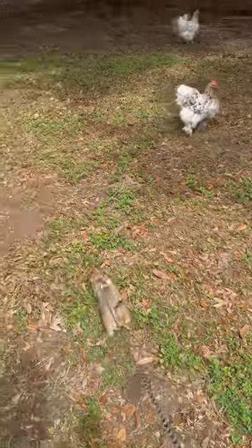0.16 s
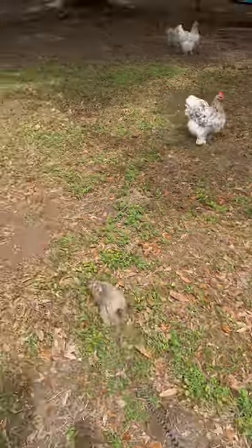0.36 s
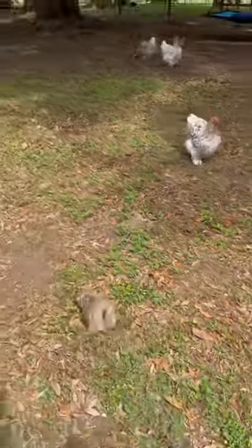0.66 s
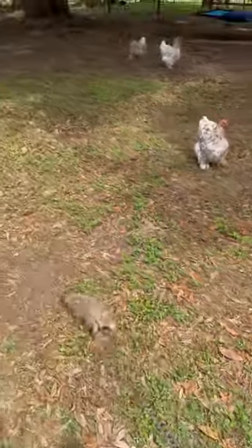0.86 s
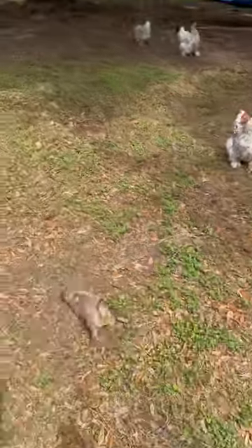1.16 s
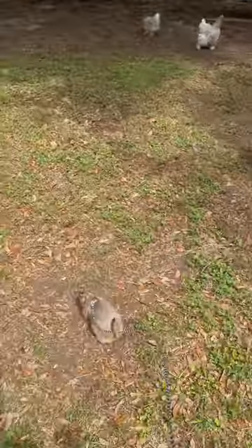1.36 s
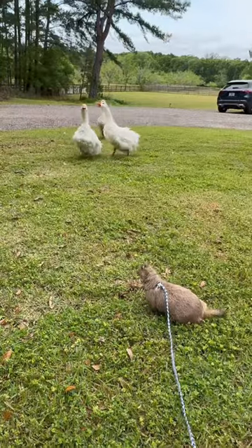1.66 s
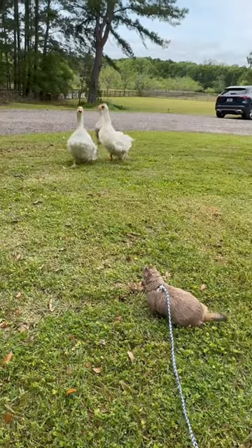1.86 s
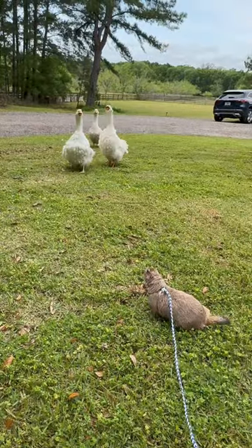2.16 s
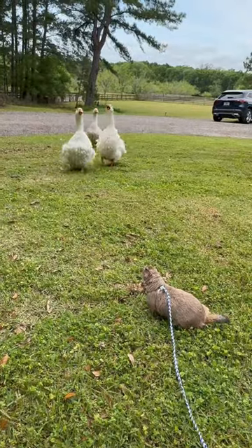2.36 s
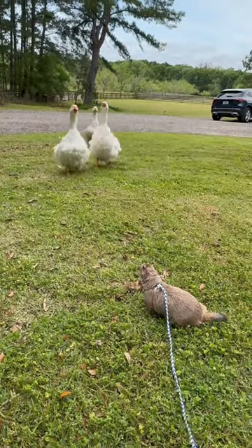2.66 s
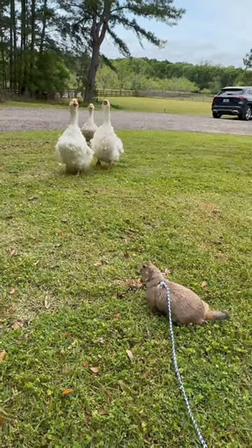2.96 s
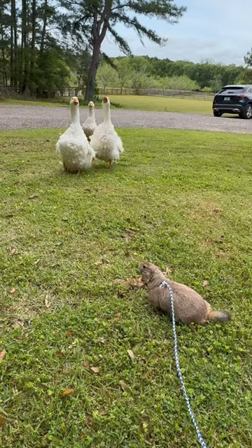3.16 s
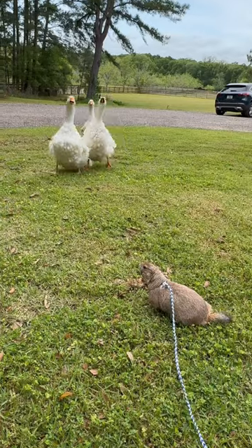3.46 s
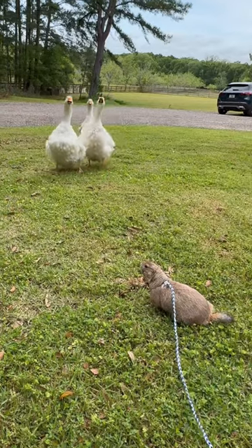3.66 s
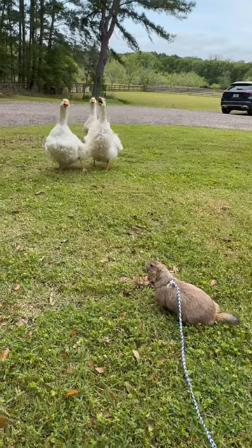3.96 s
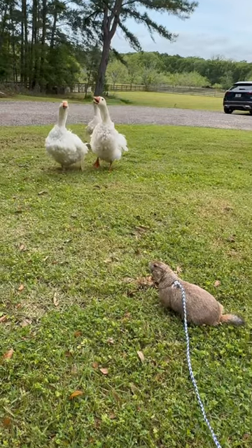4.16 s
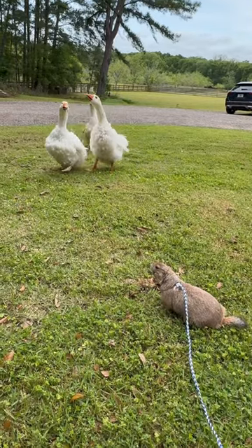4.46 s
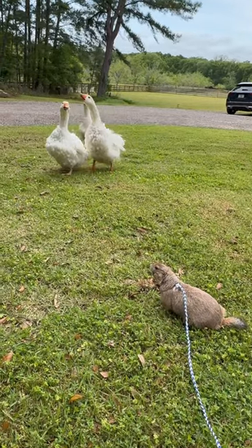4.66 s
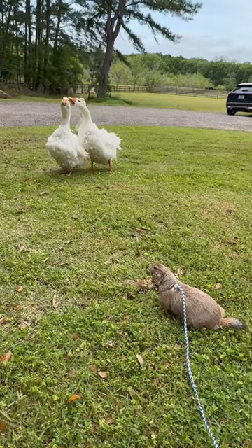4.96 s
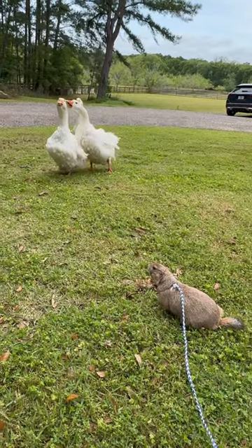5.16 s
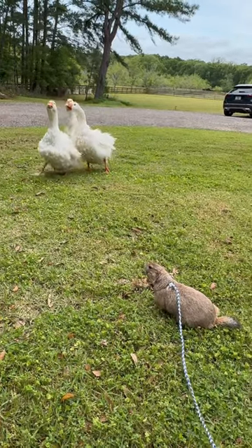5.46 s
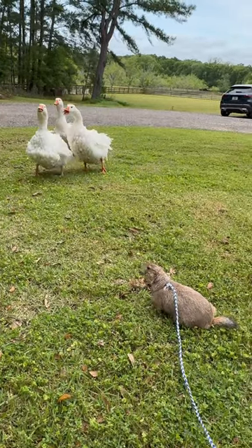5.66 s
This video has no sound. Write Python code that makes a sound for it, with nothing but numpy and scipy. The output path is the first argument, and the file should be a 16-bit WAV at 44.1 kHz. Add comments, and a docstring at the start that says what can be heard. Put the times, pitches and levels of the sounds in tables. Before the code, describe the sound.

After wind buffets, leaf crackles and tiny bird peeps, geese burst into loud, rasping, overlapping honks close to a phone outdoors, with short lulls.

```python
"""A farm lawn, where three geese honk close to a phone. Each voice flips between a rasp, made of uneven slaps
and puffs of air, and a clear tone built from partials; its pitch droops as a honk ends. Trees send back
a faint echo. Before the geese start, wind buffets the microphone, dry leaves crackle, a far fowl calls and
a small bird peeps five times. A soft, wide hiss and a distant rumble, both made of noise, lie under it all."""
import sys
import numpy as np
from scipy import signal
from scipy.fft import rfft, irfft
from scipy.io import wavfile
from scipy.ndimage import uniform_filter1d, map_coordinates

SR = 44100
rng = np.random.default_rng(int(sys.argv[2]) if len(sys.argv) > 2 else 0)


def wrap_up_sound(samples):
    """Save the sound to the file named by the first command line argument, as 16-bit audio."""
    columns = np.atleast_2d(samples).T
    # keep every value between -1 and 1, then stretch to whole-number steps
    tamed = np.clip(columns, -1, 1)
    steps = np.round(tamed * 32767).astype(np.int16)
    wavfile.write(sys.argv[1], SR, steps)


N = 255780
TIME = np.arange(N) / SR  # seconds
FREQS = np.fft.rfftfreq(N, 1 / SR)  # Hz


def undb(db):
    """Decibels to gain."""
    return 10 ** (np.asarray(db) / 20)


def unit(x):
    """Scale to rms 1."""
    return x / np.sqrt(np.mean(x ** 2))


def across(points):
    """(Hz, value) points joined on a log-frequency axis."""
    hz, value = np.transpose(points)
    return np.interp(np.log(FREQS + 1), np.log(hz), value)


def gate(start, end, edge):
    """1 between start and end, with ramps centred on both."""
    return np.clip(np.minimum(TIME - start, end - TIME) / edge + .5, 0, 1)


def swell(centre, length):
    """A smooth bump in time, nearly gone one length away from its centre."""
    return np.exp(-2 * np.minimum(((TIME - centre) / length) ** 2, 20))


def swells(rows):
    """Gain of a series of smooth bumps."""
    return sum(undb(db) * swell(centre, length) for centre, length, db in rows)


def walk(rate):
    """Smooth random wandering of rms 1, with about `rate` new values a second."""
    knots = rng.standard_normal(N // 10)
    path = np.interp(TIME * rate, np.arange(len(knots)), knots)
    return unit(uniform_filter1d(path, int(SR / rate / 2) + 1))


def filtered(x, response):
    """Apply a frequency response."""
    return irfft(rfft(x) * response, N)


def noise(colour):
    """Noise of a given spectrum, rms 1."""
    return unit(filtered(rng.standard_normal(N), undb(across(colour))))


def resonances(modes):
    """Response of steep resonances with dark valleys between them."""
    s = 1j * FREQS
    return sum(undb(db) * (s * width / (hz ** 2 + s * s + s * width)) ** 2 for hz, width, db in modes)


# The clear tones of the voices. Each row: multiple of the pitch, relative level in dB.
GRUFF_PARTIALS = [(1, -13), (2, 4), (3, -1), (4, 0), (5, -1.5), (6, -15.5), (7, -9.5), (8, -23.5), (9, -26),
                  (10, -19), (11, -29), (12, -23)]
LOUD_PARTIALS = [(1, -20), (2, -1), (3, -25), (4, -15), (5, -27.5), (6, -32), (7, -37.5), (8, -34.5),
                 (9, -30.5), (10, -31), (11, -62), (12, -40), (13, -38)]
SOFT_PARTIALS = [(1, -21), (2, -4), (3, -10.5), (4, -14.5), (5, -18.5), (6, -21), (7, -27.5), (8, -34),
                 (9, -28.5), (10, -28.5), (11, -40.5), (12, -35.5)]
# Throat resonances while rasping. Each row: frequency in Hz, width in Hz, relative level in dB.
GRUFF_RESONANCES = [(177.5, 52, -11), (728, 67, -12), (1220, 710, 0), (1830, 1200, -17), (2884, 470, -0.5),
                    (4366, 183, -6), (5610, 340, -11), (8200, 2800, -21.5)]
LOUD_RESONANCES = [(185, 61, -16), (881.4, 98, 1), (1082, 314, 3), (2242, 171, -8), (2823, 203, -10),
                   (3630, 363, -14), (4750, 167, -17), (6683, 6600, -27)]
SOFT_RESONANCES = [(172, 113, -10), (835, 87.5, 7), (1072, 495, 3.5), (1696, 133.3, -15.5), (2333, 340, -3),
                   (3180, 264, -5), (4140, 460, -14.5), (5970, 2120, -23)]
# How the geese reach the two microphone ports. Each row: frequency in Hz, left minus right in dB.
PORT_LEVELS = [(200, -.5), (400, -3), (700, -6.5), (1000, -6.5), (1300, -0.5), (2400, 1.5), (4400, 1.2),
               (8000, 0)]
# Each row: frequency in Hz, how far the left port leads in radians.
PORT_LEADS = [(100, 0), (500, -0.65), (860, -0.94), (1120, 0.78), (2200, 0.91), (2500, 0.78), (3250, 0.62),
              (3900, 1.4), (4800, -1.6), (5700, -0.89), (10000, -2.46)]


def geese(top_hz=8900, echo_db=-27, echo_s=0.1):
    """The three voices, a little to one side, and their echo; the gruff goose also growls under the others."""
    gruff = goose("gruff", GRUFF_RESONANCES, GRUFF_PARTIALS, rate_hz=180, slide=.03, jitter=0.036,
                  flutter_hz=590, flutter=1.2, chest=0.08)
    growl = goose("growl", GRUFF_RESONANCES, GRUFF_PARTIALS, rate_hz=168, slide=.08, jitter=0.025,
                  flutter_hz=575, flutter=.8, chest=0.36)
    loud = goose("loud", LOUD_RESONANCES, LOUD_PARTIALS, rate_hz=160, slide=.22, jitter=.085,
                 flutter_hz=266, flutter=1.3, chest=0.034)
    soft = goose("soft", SOFT_RESONANCES, SOFT_PARTIALS, rate_hz=176, slide=.1, jitter=.12,
                 flutter_hz=520, flutter=1.1, chest=0.04)
    voices = gruff + growl + loud + soft + squeal()
    softer_top = 0.21 + 0.83 / (1 + (FREQS / top_hz) ** 10)
    flock = filtered(voices, softer_top) + onset_hiss()
    # the ground and the phone's body shift level and phase between the ports
    lean = undb(across(PORT_LEVELS) / 2) * np.exp(.5j * across(PORT_LEADS))
    ports = np.array([lean, 1 / lean]) / np.maximum(abs(lean + 1 / lean) / 2, .7)
    dull_flock = filtered(flock, undb(echo_db) / (1 + (FREQS / 3500) ** 2))
    echo = np.interp(TIME - echo_s, TIME, dull_flock, left=0)
    scatter = trees(flock, wet_db=-19.5, t60=0.57, dull_hz=3500, delay_s=0.024)
    return filtered(flock, ports) + echo + scatter


def goose(name, throat, orders, rate_hz, slide, jitter, flutter_hz, flutter, chest):
    """Rasp and tone share one air stream; effort sets the level and the open beak lets the upper resonances out."""
    gain, bright_db, pitch, tension, clear = effort(name)
    waver = 1 + (.003 + .016 * (1 - clear)) * walk(260) + .003 * walk(30)
    tone = partials(pitch * waver, orders)
    taut = 1 + slide * tension
    slaps = rasp(rate_hz * taut, jitter, flutter_hz * taut * pitch / MIDDLE_HZ, flutter, chest)
    # neck and beak keep moving, which slides all resonances of the rasp up and down together
    stretch = 1 + .025 * walk(18)
    hoarse = map_coordinates(filtered(slaps, resonances(throat)), [np.cumsum(stretch)], mode="mirror")
    voice = np.sqrt(clear) * tone + np.sqrt(1 - clear) * unit(hoarse)
    low = filtered(voice, 1 / (1 + (FREQS / 1550) ** 16))
    # even out the level below and above 1550 Hz, so that effort alone shapes them
    body, blare = (v / np.sqrt(uniform_filter1d(v * v, size=800) + 1e-9) for v in (low, voice - low))
    return gain * (body + undb(bright_db) * blare)


MIDDLE_HZ = 590  # the pitch around which all three voices call
ATTACK_S, ATTACK_DB = .017, 8.5  # a honk starts this far down and swells
RELEASE_S, RELEASE_DB = .024, 16  # and dies away by this much before it stops
SAG_S, SAG_DULL_DB = .022, 1.3  # the push gives way, and the voice dulls
ONSET_BRIGHT_DB = 3.5  # the weak start of a honk is thinner
DROOP_S, DROOP_HZ = .034, 90  # pitch falls as the air runs out
FLIP_S = .016  # from rasp to tone and back
SLACK_S = .07  # the syrinx starts each honk taut and slackens, so the rasp slides down
# Each honk, or syllable of one, opens with a push, then sags and closes. For part of it the rasp may lock
# into a tone. Each row: voice, start in seconds, length in seconds, level in dB, brightness (upper against
# lower sound) in dB, push in seconds, sag in dB, seconds until the tone, tone length in seconds,
# pitch in Hz, glide over the tone in Hz, clear share from 0 (rasp only) to 1.
HONK_ROWS = [ ("gruff", 1.403, .261, -17.8, -3.3, .108, 6.5, .054, .056, 640, 0, .75),
             ("gruff", 1.644, .112, -19, -2, .034, 2, .032, .085, 626, -4, .9),
             ("gruff", 1.831, .143, -16.5, -1, .05, 8, 0, 0, 600, 0, 0),
             ("gruff", 2.041, .12, -23, 1, .085, 1, .017, .065, 600, -12, .87),
             ("gruff", 2.118, .098, -20, -2.5, .065, 2.5, 0, 0, 600, 0, 0),
             ("gruff", 2.265, .105, -21, 2, .028, 1.5, .006, .064, 608, -12, .95),
             ("gruff", 2.328, .145, -17.5, -3.5, .045, 7, 0, 0, 600, 0, 0),
             ("soft", 2.576, .075, -23, -2, .052, 4, .017, .038, 581, 0, .84),
             ("soft", 2.638, .232, -26, -6.5, .09, .7, .057, .18, 579, -21, .99),
             ("soft", 2.888, .157, -28, -2, .05, 0, .073, .095, 591, 35, .98),
             ("soft", 3.119, .122, -30.5, -6, .04, -1.3, .037, .095, 567, 20, .98),
             ("loud", 3.329, .034, -30, -4, .03, 0, 0, 0, 590, 0, 0),
             ("loud", 3.347, .123, -16.5, -10, .04, -1.2, .026, .078, 584, 27, .99),
             ("loud", 3.455, .081, -21.5, -9, .03, -5, 0, 0, 600, 0, 0),
             ("loud", 3.567, .14, -17, -4, .045, 1.5, .052, .059, 607, 20, .94),
             ("loud", 3.672, .07, -18, -6, .03, 1, 0, 0, 600, 0, 0),
             ("loud", 3.774, .082, -15, -4.5, .048, 4, 0, 0, 590, 0, 0),
             ("loud", 3.845, .082, -17.5, -2, .04, 1, .002, .085, 607, 28, .5),
             ("loud", 3.979, .108, -16, -6, .06, 1, .041, .07, 611, -7, .62),
             ("loud", 4.15, .04, -24, -5, .03, 0, 0, 0, 600, 0, 0),
             ("loud", 4.174, .086, -15.5, -6, .032, 7, 0, .082, 602, -31, .6),
             ("soft", 4.398, .089, -30, -2, .025, -1.5, .024, .07, 572, -20, .94),
             ("soft", 4.601, .083, -23.5, -5.5, .047, 4.5, .023, .037, 574, -16, .71),
             ("soft", 4.672, .054, -25.5, -7, .04, 0, 0, 0, 580, 0, 0),
             ("soft", 4.793, .137, -19.5, -4.5, .042, 6.5, .036, .105, 580, -20, .68),
             ("soft", 4.983, .107, -23, -4, .055, 3, .029, .044, 564, -16, .7),
             ("soft", 5.157, .087, -29.5, -5, .05, 1, .028, .065, 559, -10, .74),
             ("loud", 5.604, .154, -18.3, -8, .05, 0, .053, .069, 608, 36, .99),
             ("growl", 3.835, .335, -23, -4, .07, 7.5, 0, 0, 600, 0, 0),
             ("gruff", 5.786, .1, -39, 11, .05, 0, 0, 0, 600, 0, 0), ]


def effort(voice):
    """Gain, brightness in dB, pitch, tension and clear share; where honks overlap, the stronger one wins."""
    tracks = gain, bright, pitch, tension, clear = np.zeros((5, N))
    pitch[:] = MIDDLE_HZ
    for name, start, length, db, bright_db, push, sag_db, after, held, hz, glide_hz, share in HONK_ROWS:
        if name != voice:
            continue
        span = np.flatnonzero((TIME >= start) & (TIME < start + length))
        t = TIME[span] - start
        opening = np.clip(1 - t / ATTACK_S, 0, 1)
        closing, droop = (np.clip(1 - (length - t) / s, 0, 1) ** 2 for s in (RELEASE_S, DROOP_S))
        sag = np.clip((t - push) / SAG_S + .5, 0, 1)
        locked = np.clip(np.minimum(t - after, after + held - t) / FLIP_S + .5, 0, 1)
        level = undb(db - ATTACK_DB * opening - sag_db * sag - RELEASE_DB * closing)
        glide = glide_hz * np.interp(t, [after, after + held], [-.5, .5])
        controls = np.array([level,
                             bright_db + ONSET_BRIGHT_DB * opening - SAG_DULL_DB * sag,
                             hz + glide - DROOP_HZ * droop,
                             np.exp(-t / SLACK_S),
                             locked * share])
        stronger = level > gain[span]
        tracks[:, span[stronger]] = controls[:, stronger]
    gain, bright, pitch, tension, clear = uniform_filter1d(tracks, size=80)
    return gain, bright, pitch, tension, np.clip(clear, 0, .998)


def partials(pitch, orders):
    """A harmonic tone whose partials waver a little on their own."""
    phase = 2 * np.pi * np.cumsum(pitch) / SR
    shimmer_db = 2.2
    tone = np.zeros(N)
    for k, db in orders:
        level = undb(db + shimmer_db * walk(35))
        tone += level * np.sin(k * phase + rng.uniform(0, 2 * np.pi))
    return unit(tone)


def rasp(rate_hz, jitter, flutter_hz, flutter, chest):
    """The slack syrinx slaps shut unevenly; between slaps it flutters faster, unsteadily, and lets out a puff."""
    scatter_db, puff, turbulence = 2.2, .7, .28  # puff: its fading time, in slap cycles
    cycles = np.cumsum(rate_hz * np.exp(jitter * walk(150) + .02 * walk(12))) / SR
    count = cycles.astype(int)
    size = undb(scatter_db * rng.standard_normal(N // 10))[count]  # each slap has its own strength
    opening = size * np.exp(-(cycles - count) / puff)
    slaps = size * np.diff(count, prepend=0)
    wobble = .025 * walk(400) + .035 * walk(45)
    flutter_count = (np.cumsum(flutter_hz * np.exp(wobble)) / SR).astype(int)
    flaps = np.diff(flutter_count, prepend=0) * opening
    breath = filtered(opening * rng.standard_normal(N), FREQS / (FREQS + 1200))
    hum = np.cos(2 * np.pi * cycles)
    return unit(slaps) + flutter * unit(flaps) + turbulence * unit(breath) + chest * hum


# The squeal's tone. Each row: multiple of the pitch, relative level in dB.
SQUEAL_PARTIALS = [(1, -2), (2, -5), (3, 0), (4, -3), (5, -14), (6, -18), (7, -21)]


def squeal(start=4.208, length=.07, top_hz=898, fall_hz=190, level_db=-19.5, peak_s=.026, width_s=.033):
    """A voice jumps to a higher register and falls away."""
    pitch = top_hz - fall_hz * np.clip((TIME - start) / length, 0, 1) ** 2
    tone = partials(pitch * (1 + .006 * walk(250)), SQUEAL_PARTIALS)
    return tone * undb(level_db) * swell(start + peak_s, width_s) * gate(start, start + length, .005)


# Bursts of high noise at some honk onsets. Each row: middle in seconds, spread in seconds, level in dB.
ONSET_HISS_ROWS = [(1.42, .02, -43), (1.845, .025, -35), (2.275, .018, -37), (2.917, .022, -42),
                   (3.578, .018, -26), (3.79, .02, -26)]
# The colour of these bursts. Each row: frequency in Hz, relative level in dB per Hz.
ONSET_HISS_SPECTRUM = [(2500, -25), (4500, -2), (5800, 0), (8000, -6), (11000, -14), (15000, -9)]


def onset_hiss():
    """Short bursts of high noise at some honk onsets, chopped about 180 times a second."""
    cycles = np.cumsum(180 + 15 * walk(100)) / SR
    chop = unit(np.exp(-2 * (cycles % 1)))
    return swells(ONSET_HISS_ROWS) * chop * noise(ONSET_HISS_SPECTRUM)


def trees(x, wet_db, t60, dull_hz, delay_s):
    """Diffuse, dull scatter from the tree line: a fading noise tail, different in each ear."""
    tail = undb(-60 * TIME / t60) * np.minimum(TIME / delay_s, 1)  # builds up over delay_s
    tail = tail / np.sqrt(np.sum(tail ** 2))
    dull = filtered(x, 1 / (1 + (FREQS / dull_hz) ** 2))
    ears = [signal.fftconvolve(dull, tail * rng.standard_normal(N))[:N] for _ in range(2)]
    return undb(wet_db) * np.array(ears)


# Far fowl. Each row: middle of the call in seconds, level in dB.
FAR_CALL_ROWS = [(0.171, -36), (.39, -36), (0.6, -34.5), (.82, -34), (1.036, -34), (1.244, -34)]
# Small bird. Each row: start in seconds, rough length in seconds, top pitch in Hz, level in dB.
PEEP_ROWS = [(.968, 0.058, 7170, -39), (1.062, 0.066, 6950, -37), (1.155, 0.064, 6860, -35),
             (1.244, 0.052, 6930, -36), (1.324, 0.077, 6850, -39.5)]


def far_birds(crow_hz=775, crow_db=-53):
    """Short hoarse calls and one faint long note from across the yard; thin peeps slide up to their pitch."""
    throat = resonances([(790, 210, 5), (1030, 190, 2), (1750, 420, -17)])  # (Hz, width in Hz, dB)
    hoarse = unit(filtered(rasp(190, jitter=0.07, flutter_hz=300.6, flutter=0.34, chest=0), throat))
    calls = hoarse * sum(undb(db) * swell(t, .021) for t, db in FAR_CALL_ROWS)
    crow = np.sin(2 * np.pi * np.cumsum(crow_hz + 5 * walk(59.7)) / SR)
    birds = calls + undb(crow_db) * gate(0.7, 1.17, .1) * crow
    for start, length, top_hz, db in PEEP_ROWS:
        slide_hz = 900 * np.exp(-np.maximum(TIME - start, 0) / 0.0054)
        pitch = top_hz - slide_hz + 25 * walk(150)
        shape = swell(start + length / 2, length * 0.58) * gate(start, start + 2 * length, .004)
        birds = birds + undb(db) * shape * np.sin(2 * np.pi * np.cumsum(pitch) / SR)
    return birds + trees(birds, wet_db=-7, t60=1.0, dull_hz=9000, delay_s=0.0094)


# Gusts on the microphone. Each row: middle in seconds, spread in seconds, level in dB.
GUST_ROWS = [(.12, .4, -33), (.295, .085, -23), (.47, .23, -30), (.915, .055, -32)]
# Soft bumps on the phone. Each row: middle in seconds, spread in seconds, level in dB.
BUMP_ROWS = [(0.37, .038, -27), (0.395, 0.025, -19), (0.422, 0.012, -16.5), (0.455, 0.02, -18.5),
             (0.54, 0.016, -31.5), (0.734, 0.035, -32.5), (0.922, 0.083, -36), (1.275, 0.016, -33.5)]
# The colour of the gusts. Each row: frequency in Hz, relative level in dB per Hz.
WIND_SPECTRUM = [(25, -26), (60, 5), (100, -4), (170, -14.5), (300, -27), (800, -65.5)]


def wind(side_db=-21):
    """Gusts and soft bumps, swells of low noise, rumble in both ports nearly alike."""
    # the colour of the bumps: (Hz, relative dB per Hz)
    thud = [(30, -23), (90, -2.5), (140, -3.5), (230, -8.5), (420, -21), (900, -41), (3000, -63)]
    mid, side = (noise(WIND_SPECTRUM) * swells(GUST_ROWS) + noise(thud) * swells(BUMP_ROWS) for _ in range(2))
    return mid + undb(side_db) * np.array([side, -side])


# Leaf crackles. Each row: time in seconds, relative level in dB.
CRACKLE_ROWS = [(0.1266, -35), (0.1583, -36.5), (0.3262, -31), (0.4735, -28.5), (0.674, -37), (0.7331, -25),
                (0.903, -30.5), (1.0337, -31), (1.2218, -31.5)]
# Swells in the background hiss. Each row: middle in seconds, spread in seconds, relative level in dB.
HISS_SWELL_ROWS = [(.46, .24, -43.5), (.92, .26, -50), (5.59, .32, -36.5)]
# The colour of crackle and hiss. Each row: frequency in Hz, relative level in dB per Hz.
HISS_SPECTRUM = [(800, -17.5), (2500, -15), (4500, -9.5), (6500, -4.5), (9000, -8.5), (12000, -23),
                 (15000, -9)]


def leaves_and_hiss(ring_s=0.0028, side_db=4, rest_db=-65.5):
    """Dry leaves snap one by one, as short fading noise, over a wide, soft hiss."""
    snaps = sum(undb(db) * (TIME >= t) * np.exp(-abs(TIME - t) / ring_s) for t, db in CRACKLE_ROWS)
    level = snaps + (undb(rest_db) + swells(HISS_SWELL_ROWS)) * undb(2.2 * walk(25))
    mid, side = noise(HISS_SPECTRUM), undb(side_db) * noise(HISS_SPECTRUM)
    return level * np.array([mid + side, mid - side]) / 2


# The colour of the distant background. Each row: frequency in Hz, relative level in dB per Hz.
AIR_SPECTRUM = [(20, -12), (50, 2.5), (82, 13.5), (130, -4), (400, -16), (750, -16.5), (1150, -21.5),
                (2000, -25), (4000, -29), (8000, -42), (11000, -47), (15000, -40)]


def air(level_db=-43, side_share=0.1):
    """Distant rumble, nearly the same in both ears in the bass and wide in the treble."""
    mid = noise(AIR_SPECTRUM) * undb(.6 * walk(5))
    side = filtered(noise(AIR_SPECTRUM), np.clip(side_share + FREQS / 2500, 0, 1))
    return undb(level_db) * np.array([mid + side, mid - side])


def scene():
    """Everything on the lawn."""
    return geese() + far_birds() + wind() + leaves_and_hiss() + air()


def record(dry):
    """The phone rounds the highest peaks and cuts the top above 16 kHz."""
    top_hz = 16000
    rounded = dry / (1 + (dry / .9) ** 4) ** .25
    return signal.sosfilt(signal.ellip(8, .2, 70, top_hz, fs=SR, output="sos"), rounded)


dry = scene()
out = record(dry)
wrap_up_sound(out)
```